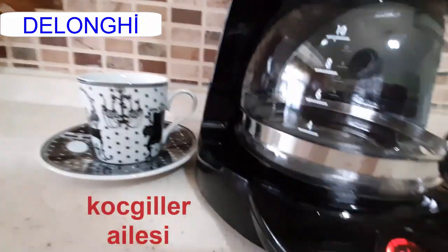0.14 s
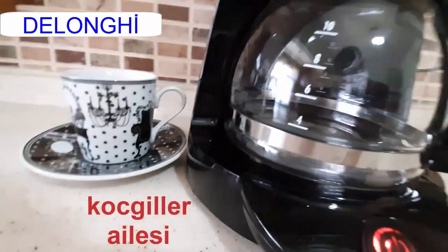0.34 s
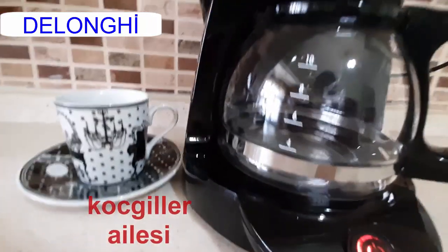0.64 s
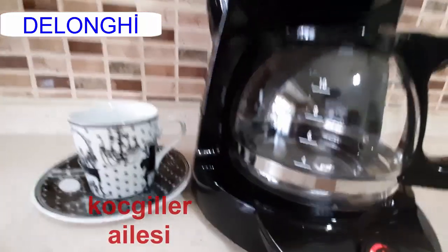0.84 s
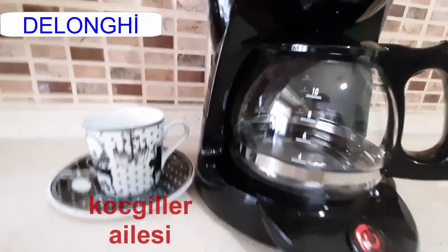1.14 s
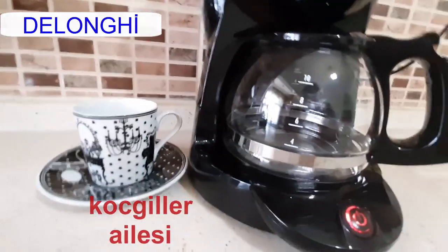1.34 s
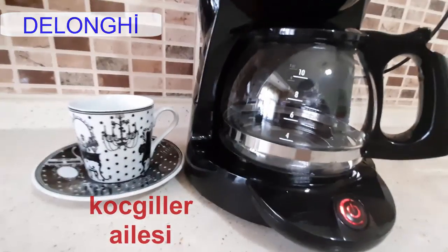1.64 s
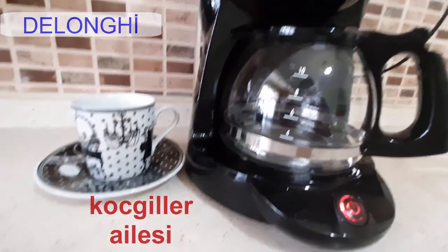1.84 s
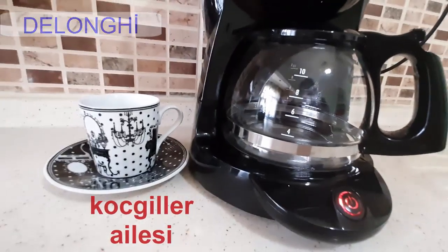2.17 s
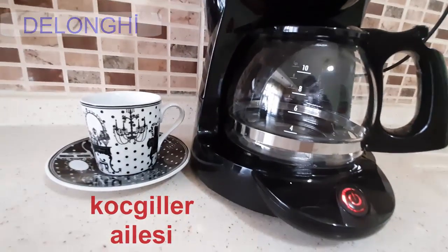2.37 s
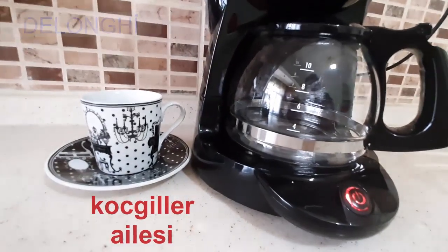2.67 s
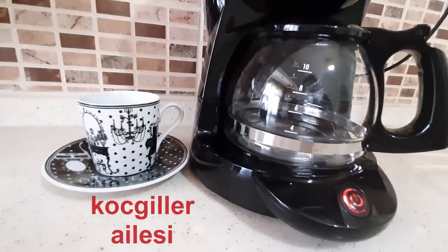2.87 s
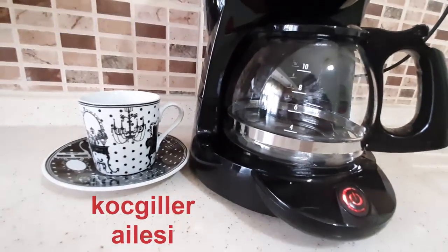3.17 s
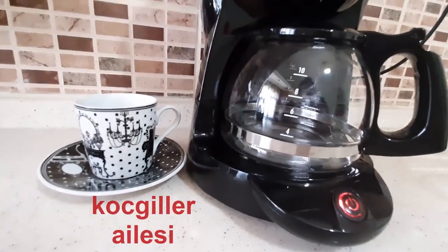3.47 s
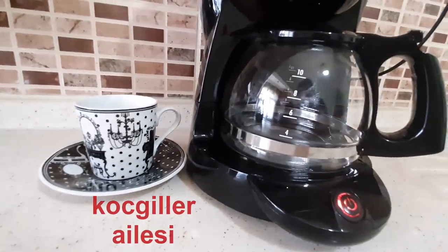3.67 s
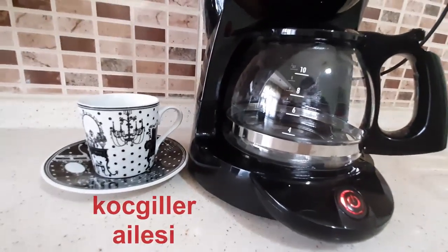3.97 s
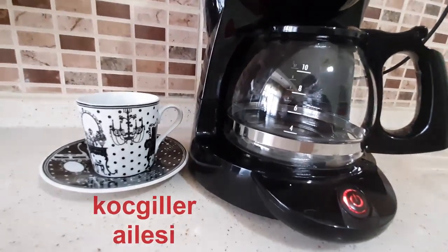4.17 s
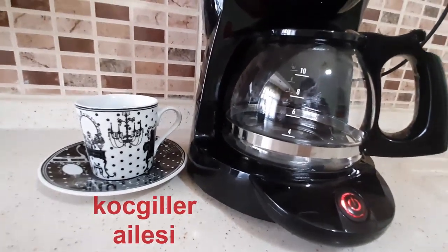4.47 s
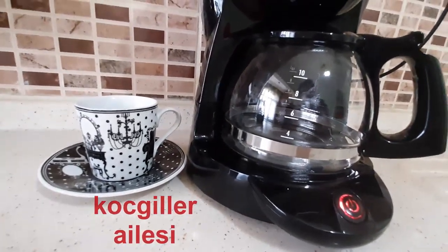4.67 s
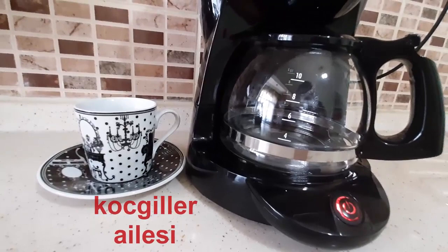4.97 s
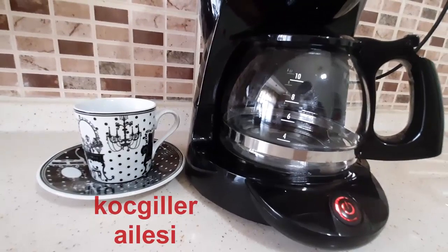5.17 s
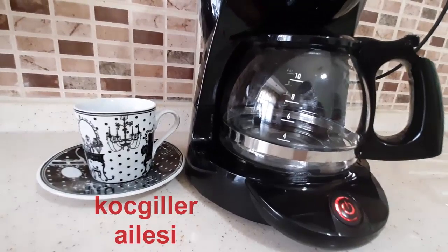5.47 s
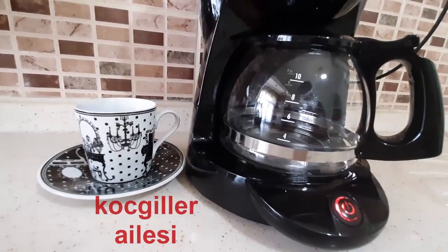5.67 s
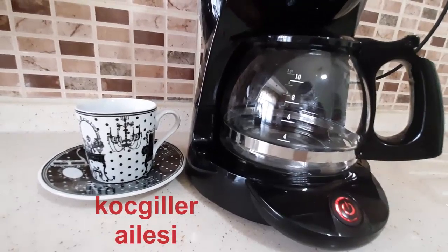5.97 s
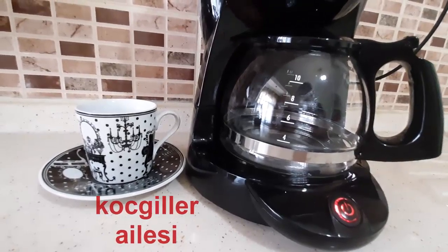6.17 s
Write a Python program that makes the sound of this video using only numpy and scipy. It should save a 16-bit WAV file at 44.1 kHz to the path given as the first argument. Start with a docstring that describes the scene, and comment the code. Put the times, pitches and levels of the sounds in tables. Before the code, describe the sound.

A coffee machine heating water, heard close on a hand-held phone in a kitchen. Breathy steam hiss and a hollow, wavering low hum continue throughout. Wet pops and gurgles crowd the first second, thin out, surge again after three seconds, calm down, then return towards the end. Fingers rasp and tick against the phone, mostly on the left.

```python
"""A drip coffee maker heats up on a tiled kitchen counter, heard through a hand-held phone with two ports.
From the start noise through resonances makes the empty jug's hum, water, hissing steam and tube whistles.
Bubbles burst as puffs of noise, most densely around 0.4-1.3 s, 3.1-3.9 s and 5.2-6.3 s; each stirs the water.
Fingers rasp, tick and knock on the phone from 0.26 s, as noise puffs, ringing clicks and low sines;
from 0.55 s big bubbles plop as short rising sines."""
import sys
import numpy as np
from scipy import signal
from scipy.io import wavfile
from scipy.ndimage import uniform_filter1d

SR = 44100
rng = np.random.default_rng(int(sys.argv[2]) if len(sys.argv) > 2 else 0)


def to_wav(s):
    """Save 16-bit WAV."""
    ch = np.atleast_2d(s).T  # columns
    pcm = np.round(np.clip(ch, -1, 1) * 32767)  # PCM
    wavfile.write(sys.argv[1], SR, pcm.astype(np.int16))


N = 278271

# Bubbles bursting in the tube. Each row: start in seconds, low splash, high splash and spit levels in dB,
# spit pitch in Hz, length in seconds.
BURSTS = [(0.07, -46, -46, -39, 3400, .006), (0.391, -40, -34, -39, 3380, 0.016),
          (0.532, -56, -54, -31, 3370, .004), (0.543, -45, -34, -40, 4900, .009),
          (0.579, -49, -36, -45, 4260, 0.0073), (0.603, -36.5, -38, -33.5, 4260, 0.0078),
          (0.608, -31.5, -29, -32.5, 3250, 0.017), (0.658, -45, -33, -37, 4000, .005),
          (0.67, -42, -33.5, -44, 3000, 0.0071), (0.713, -40, -34, -31, 3290, 0.0091),
          (0.758, -58, -31.5, -45, 3900, 0.026), (0.87, -48, -58, -51, 4120, 0.011),
          (0.909, -29.5, -26, -39, 3900, 0.03), (0.913, -36, -44, -31.5, 3820, 0.025),
          (0.941, -34, -29, -32, 4070, 0.0063), (0.98, -39, -47, -27, 3500, 0.0084),
          (1.027, -56, -48, -38, 3600, .004), (1.091, -36, -52, -31, 3530, 0.012),
          (1.115, -29, -29.5, -52, 4190, 0.025), (1.136, -34, -29, -49, 3370, 0.026),
          (1.302, -48, -33.5, -49, 3890, 0.02), (1.883, -38, -32, -37, 4470, 0.0074),
          (2.028, -42, -39.5, -39, 3800, 0.019), (2.744, -40, -47, -40, 4270, 0.0043),
          (2.791, -56, -39, -40, 4360, 0.0068), (3.103, -47, -52, -33, 3380, 0.0079),
          (3.116, -33.5, -45, -37, 3100, 0.014), (3.18, -35.5, -51, -39, 4000, 0.0046),
          (3.214, -34.5, -39, -31.5, 3160, 0.026), (3.251, -36, -39, -28, 3460, 0.0094),
          (3.263, -32, -35, -32, 3100, 0.017), (3.342, -39, -53, -33, 3400, 0.013),
          (3.363, -36, -50, -30.5, 3500, 0.012), (3.415, -37, -35, -27, 4170, 0.01),
          (3.451, -32, -41, -24.5, 3430, 0.0075), (3.456, -40, -38, -30, 3430, 0.0065),
          (3.471, -47, -52, -29, 5070, 0.0082), (3.498, -28.5, -29, -36, 4200, 0.0073),
          (3.54, -33, -48, -50, 4065, .006), (3.573, -42, -53, -34.5, 3780, 0.018),
          (3.62, -51, -53, -34, 3480, 0.0091), (3.65, -33, -38, -37, 3500, 0.029),
          (3.68, -32, -53, -39, 4530, 0.022), (3.71, -37, -34, -33.5, 3870, 0.024),
          (3.922, -33, -36, -47, 3870, 0.0046), (3.949, -31.5, -24.5, -36, 3250, 0.0085),
          (5.238, -36.5, -34, -36, 4440, 0.012), (5.267, -55, -35, -46, 4860, 0.013),
          (5.285, -52, -39, -58, 4164, 0.0089), (5.434, -58, -51, -51, 4300, 0.0058),
          (5.483, -46, -39, -46, 4200, 0.0045), (5.525, -50, -36.5, -39, 4410, 0.015),
          (5.556, -35.5, -44, -36, 3900, 0.0076), (5.642, -43, -46, -46, 3930, 0.0057),
          (5.931, -38.5, -50, -39, 4350, 0.0063), (5.997, -34.5, -44, -33.5, 4340, 0.011),
          (6.109, -42, -49, -42, 3950, .008), (6.136, -41, -36, -35.5, 3950, 0.0081),
          (6.151, -30, -41, -41, 4100, 0.0055), (6.184, -39, -33, -44, 4380, 0.0076),
          (6.218, -53, -54, -25.5, 3700, 0.0032), (6.222, -58, -55, -31, 3300, 0.0083),
          (6.26, -37, -32, -47, 4230, 0.0067), (6.268, -40, -46, -35, 3100, 0.012),
          (6.279, -30, -38, -27.5, 3500, 0.019), (6.301, -31.5, -35, -35, 4800, .008)]
# Resonances of the plastic housing. Each row: pitch in Hz, width in Hz, relative level in dB.
HOUSING_MODES = [(3400, 350, 15.5), (4270, 120, 11.5), (4950, 1500, 2), (3200, 570, -6)]
# Balance of the two ports by pitch. Each row: pitch in Hz, left minus right in dB.
PORT_BALANCE = [(60, -8), (110, 0), (200, -3), (380, 0.5), (700, -1.5), (1290, 0), (2380, -1), (4400, -4.5),
                (8120, 3), (15000, -2.5)]

PORT_LAG_S = 0.00019   # the left port hears shared sound this much later
SPLASH_PAN_DB = -2.7   # left minus right


def amp(db):
    """dB to gain."""
    return 10 ** (np.asarray(db) / 20)


def rms_one(x):
    """Scale to rms 1."""
    return x / np.sqrt(np.mean(x ** 2) + 1e-20)


def peak_one(x):
    """Scale to a typical peak of 1: 2.5 times the loudest short-term rms."""
    return x / (2.5 * np.sqrt(np.max(uniform_filter1d(x ** 2, size=200))))


def at_hz(points, hz):
    """Read a table on a log-frequency axis."""
    table_hz, values = np.transpose(points)
    return np.interp(np.log(hz), np.log(table_hz), values)


def in_time(rows):
    """Columns of a table as straight lines in time."""
    s, *columns = np.transpose(rows)
    return [np.interp(np.arange(N) / SR, s, c) for c in columns]


def drift(corner_hz):
    """Slow chance of spread 1: noise at SR / 40 through a double one-pole."""
    r = np.exp(-80 * np.pi * corner_hz / SR)
    coarse = rng.standard_normal(N // 40 + 2002)
    slow = signal.lfilter([1], [1, -2 * r, r * r], coarse)[2000:]   # settled
    return np.interp(np.arange(N) / 40, np.arange(len(slow)), rms_one(slow))


def resonate(x, hz, width_hz):
    """Two-pole resonance, gain 1 on top."""
    r = np.exp(-np.pi * width_hz / SR)
    poles = [1, -2 * r * np.cos(2 * np.pi * hz / SR), r * r]
    return signal.lfilter([(1 - r * r) / 2, 0, (r * r - 1) / 2], poles, x)


def stereo_pair(hz, mid, side):
    """Left and right as alike and as loud as the two ports hear this pitch."""
    # Each row: pitch in Hz, left-right likeness (correlation).
    likeness = [(60, 0.92), (130, 0.76), (290, 1), (640, 0.57), (1410, 0.061), (3100, -0.1), (6820, -0.29),
                (15000, 0.14)]
    alike = np.clip(at_hz(likeness, hz), -.99, .99)
    lean = amp(at_hz(PORT_BALANCE, hz) / 2 * np.array([[1], [-1]]))
    return lean * (np.sqrt(1 + alike) * mid + np.sqrt(1 - alike) * side * [[1], [-1]])


def banded(spectrum, patchy_db, flicker_hz, grain_db):
    """Narrow bands of grainy stereo noise, flickering partly together, partly each on its own; rms 1."""
    low, high = spectrum[0][0], spectrum[-1][0]
    edges = low * 2 ** np.arange(0, np.log2(high / low) + .2, .4)   # 0.4 octave apart
    grains = amp(grain_db * drift(184))   # bubbles come in clumps
    white = rng.standard_normal((2, 2, N)) * grains
    out, together = 0, drift(flicker_hz)
    for k, (a, b) in enumerate(zip(edges, np.minimum(edges[1:], .45 * SR))):
        band = signal.butter(2, [a, b], "band", fs=SR, output="sos")
        mid, side = signal.sosfilt(band, white[k % 2])
        hz = np.sqrt(a * b)
        level_db = at_hz(spectrum, hz) + patchy_db * (together + drift(flicker_hz))
        out = out + amp(level_db) * stereo_pair(hz, mid, side)
    return rms_one(out)


def sung(modes):
    """Turbulent noise singing in fixed resonances of wavering level; rms 1."""
    out, white = 0, rng.standard_normal((2, N))
    for hz, width_hz, level_db in modes:
        mid, side = resonate(resonate(white, hz, width_hz), hz, 3 * width_hz)
        gain = amp(level_db + 2.95 * drift(3.6)) / np.sqrt(width_hz)
        out = out + gain * stereo_pair(hz, mid, side)
    return rms_one(out)


def whistle(centre_hz, width_hz, left_db, shared):
    """A broken, wandering note: narrow noise on a carrier, partly shared by the ports; rms 1."""
    phase = 2 * np.pi * np.cumsum(centre_hz) / SR
    lowpass = signal.butter(2, width_hz / 2, fs=SR, output="sos")
    slow = signal.sosfilt(lowpass, rng.standard_normal((2, 2, N)))   # (cosine / sine part, port, time)
    slow[:, 0] += shared * np.array([slow[1, 1], -slow[0, 1]])   # the shared part arrives a quarter cycle apart
    note = slow[0] * np.cos(phase) + slow[1] * np.sin(phase)
    waver = amp(0.38 * drift(30) + 2.5 * drift(3.1))
    return rms_one(amp([[left_db], [0]]) * waver * note)


def bubbles(per_s, cycles, low_hz, high_hz, lag_s):
    """Bubbles collapse at random in clumps, each ringing a few cycles; rms 1."""
    sizes = amp(4.5 * np.minimum(rng.exponential(1, N), 3.5)) * rng.choice([-1, 1], N)
    born = rng.random(N) < per_s * amp(5 * drift(12)) / SR
    dealt, out = rng.integers(0, 10, N), np.zeros((2, N))
    for k, hz in enumerate(np.geomspace(low_hz, high_hz, num=10)):
        hits = sizes * born * (dealt == k) + 1e-18   # never exactly zero
        ring = resonate(resonate(hits, hz, hz / cycles), hz, 1.9 * hz / cycles)
        ring = amp(-3.5 * np.log2(hz / low_hz)) * rms_one(ring)
        out += amp([[at_hz(PORT_BALANCE, hz)], [0]]) * [np.roll(ring, round(lag_s * SR)), ring]
    return rms_one(out)


def burst(length_s, rise_s, snap, grain_db, size):
    """A stereo puff of grainy noise: a snap at the start, about length_s of body, then a quick fade."""
    t = np.arange(size) / SR
    shape = np.exp(-(t / length_s) ** 2) + snap * np.exp(-t / 0.00051)
    grains = amp(grain_db * np.repeat(rng.standard_normal(size // 64), 64))
    return rng.standard_normal((2, size)) * (1 - np.exp(-t / rise_s)) * shape * grains


def add(out, s, sound, pan_db):
    """Mix a sound in at time s, panned by pan_db left minus right."""
    i = round(s * SR)
    panned = amp(pan_db / 2 * np.array([[1], [-1]])) * sound
    out[:, i:i + sound.shape[-1]] += panned[:, :N - i]


def swells(times, peaks_db, shape):
    """Sum of one shape in time per event, each as high as its peak."""
    t = np.linspace(0, N / SR, num=3000)
    return np.interp(np.arange(N) / SR, t, amp(peaks_db) @ shape(t - np.reshape(times, (-1, 1))))


def stirring():
    """Every burst stirs the water for a moment: one swell each, as high as its low splash; powers add."""
    rise_s, fall_s = 0.0068, 0.022   # of the power
    s, low_db, *_ = np.transpose(BURSTS)
    power = swells(s, 2 * low_db, lambda t: np.exp(-np.abs(t) / np.where(t < 0, rise_s, fall_s)))
    return np.sqrt(power)


def stirred(level_db, stir, stir_db):
    """Gain of a steady level with the stir on top, stir_db against the splashes; powers add."""
    return np.hypot(amp(level_db), amp(stir_db) * stir)


def jug_hum():
    """The jug's air resonance: noise rung to a wavering note on a slow level, short booms and weaker modes."""
    # Each row: time in seconds, steady level in dB.
    hum_level = [(0.0, -54.5), (0.42, -47), (0.49, -63), (0.56, -43.5), (1.1, -46), (1.5, -46.5),
                 (2.1, -45.5), (2.8, -47), (2.9, -52.5), (3.32, -47), (3.5, -41.5), (3.95, -40),
                 (4.22, -51.5), (4.9, -43.5), (5.55, -44.5), (5.85, -52.5), (6.31, -52)]
    # The hum booms out for a moment. Each row: centre in seconds, peak level in dB.
    boom_rows = [(.09, -41), (.21, -38.5), (.62, -41), (.685, -35), (.775, -50), (.945, -41), (.995, -47),
                 (1.065, -38.5), (1.118, -47), (1.19, -39), (1.363, -34.5), (1.589, -37.5), (1.76, -38),
                 (2.0, -40), (2.321, -41), (2.99, -47), (3.151, -35.5), (3.465, -38), (3.525, -35),
                 (3.6, -45), (3.76, -39.5), (3.98, -35), (4.44, -48.5), (4.64, -45), (4.76, -39.5),
                 (4.93, -37.5), (5.09, -47), (5.27, -36), (5.431, -40), (5.52, -40), (5.64, -42),
                 (5.761, -35), (5.98, -36), (6.019, -43), (6.115, -49), (6.157, -42), (6.205, -39.5)]
    # Weaker modes. Each row: pitch in Hz, width in Hz, relative level in dB.
    jug_modes = [(236, 17.5, -3), (271.4, 19.5, 1), (357.4, 30, -4), (376.5, 13.5, -2.5), (444, 13.4, -8.5),
                 (615, 24, -7)]
    hum_hz, width_hz, boom_spread_s = 306.1, 19, 0.022
    lump_db, lump_corner_hz, evenness = 1, 12, 0.85
    white = rng.standard_normal((2, N))
    mid, side = resonate(resonate(white, hum_hz, width_hz), hum_hz, 3 * width_hz)
    swell = uniform_filter1d(rms_one(mid) ** 2, size=1800) + 0.11
    note = rms_one(stereo_pair(hum_hz, mid, side) / swell ** (evenness / 2))   # partly evened out
    steady = amp(*in_time(hum_level))
    booms = swells(*np.transpose(boom_rows), lambda t: np.exp(-(t / boom_spread_s) ** 2 / 2))
    level = np.hypot(steady * amp(lump_db * drift(lump_corner_hz)), booms)
    return level * note + amp(-3.5) * steady * sung(jug_modes)


def churning(stir):
    """Low churning of the water: flickering bands of noise and low collapsing bubbles."""
    # Each row: pitch in Hz, relative level in dB per Hz.
    churn_spectrum = [(310, -3), (360, -3), (470, -4.5), (620, -5), (715, -5)]
    # Each row: time in seconds, level in dB before stirring.
    churn_level = [(0.0, -47.5), (0.25, -52.5), (0.32, -45), (0.47, -50.5), (0.6, -48.5), (1.1, -47),
                   (1.5, -54.5), (2.0, -53.5), (3.14, -59), (3.27, -54), (3.46, -52), (3.6, -43.5),
                   (3.82, -54.5), (4.7, -56), (5.4, -54.5), (5.52, -49), (5.8, -55), (6.1, -54),
                   (6.31, -57)]
    level_db, = in_time(churn_level)
    water = banded(churn_spectrum, patchy_db=1.17, flicker_hz=7.3, grain_db=1.5)
    glugs = amp(-9) * bubbles(per_s=60, cycles=3.9, low_hz=333, high_hz=743, lag_s=0)
    return stirred(level_db, stir, -15.5) * (water + glugs)


def gurgling(boil_db, stir):
    """Water gurgles in the heater tube: flickering bands plus noise singing in the tube's resonances."""
    # Each row: pitch in Hz, relative level in dB per Hz.
    gurgle_spectrum = [(800, -16), (920, -5.5), (1200, -9.5), (1600, -9.5), (2100, -8.5), (2700, -8.5),
                       (3300, -17.5)]
    # Faint whistles in the tube. Each row: pitch in Hz, width in Hz, relative level in dB.
    tube_modes = [(1054, 16, 1), (1520, 57, 4), (2020, 43, 2)]
    water = banded(gurgle_spectrum, patchy_db=2.0, flicker_hz=8.6, grain_db=0.5)
    return stirred(boil_db, stir, -15.5) * (water + amp(-8.0) * sung(tube_modes))


def crackling(boil_swing_db, stir):
    """Small bubbles collapse at random, louder as the boil rises and when stirred."""
    level_db = -66 + 1.04 * boil_swing_db
    small = bubbles(per_s=160, cycles=6.3, low_hz=803, high_hz=4800, lag_s=PORT_LAG_S)
    return stirred(level_db, stir, -19) * small


def rumbling(boil_swing_db, stir):
    """Low noise bands follow a third of the boil's swing and every stir."""
    # Each row: pitch in Hz, relative level in dB per Hz.
    rumble_spectrum = [(18, -19), (33, -43), (50, -14.5), (70, -22), (131, -3), (184, -7.5), (260, -2.5),
                       (300, 3)]
    level_db = -51.5 + 0.32 * boil_swing_db
    low_noise = banded(rumble_spectrum, patchy_db=1.86, flicker_hz=17.0, grain_db=0.5)
    return stirred(level_db, stir, -19.5) * low_noise


def simmer_hiss():
    """Noise in broad resonances, a share reaching both ports, the left one later; faint steam bands added."""
    # Hiss coloured differently at each port. Each row: pitch in Hz, width in Hz, left and right relative
    # levels in dB.
    simmer_modes = [(3226, 510, -6.5, -4), (3430, 310, -4.5, 4), (3776, 360, -5, -0.5),
                    (4260, 450, -2, 5.5), (4966, 295, -37, 4), (5370, 440, 0.5, -1.5), (6160, 680, -12, 0),
                    (6894, 350, -4, -7), (7620, 560, -24, -7)]
    # The highest bands come and go. Each row: time in seconds, gain in dB.
    top_level = [(0, -2.5), (.9, -1), (1.2, 2), (2.7, 0), (2.9, -3), (3.4, 0), (3.8, 2), (5.7, 0),
                 (5.95, 0), (6.31, 1)]
    # Each row: pitch in Hz, relative level in dB per Hz.
    steam_spectrum = [(2000, -47), (2600, -29), (3400, -22), (4300, 5), (6200, 2), (7700, -9), (8700, -24)]
    share, top_from_hz = 0.11, 6500
    common, *own = rng.standard_normal((3, N))
    both = np.array([np.roll(common, round(PORT_LAG_S * SR)), common])
    pair = np.sqrt(share) * both + np.sqrt(1 - share) * np.array(own)
    out, (top_db,) = 0, in_time(top_level)
    for k, (hz, width_hz, left_db, right_db) in enumerate(simmer_modes):
        band = resonate(resonate(pair, hz, width_hz), hz, 4.5 * width_hz) / np.sqrt(width_hz)
        level_db = np.array([[left_db], [right_db]]) + 1.3 * drift(18) + top_db * (hz > top_from_hz)
        out = out + (-1) ** k * amp(level_db) * band
    steam = banded(steam_spectrum, patchy_db=1.5, flicker_hz=34, grain_db=-2.0)
    return rms_one(out) + amp(-19.0) * steam


def outlet_whistle(whistle_db):
    """The outlet whistles: narrow noise on a wandering pitch."""
    # Each row: time in seconds, centre pitch in Hz before wandering.
    pitch = [(0, 3420), (.45, 3420), (.55, 3900), (.8, 3930), (1.05, 3800), (1.6, 3800), (2.8, 3950),
             (3.6, 3960), (4.2, 4050), (5.5, 3980), (6.31, 3920)]
    centre_hz = in_time(pitch)[0] + 25 * drift(4.6)
    return amp(whistle_db) * whistle(centre_hz, width_hz=235, left_db=-11, shared=0.22)


def tube_note(stir):
    """The lowest note of the tube drifts with the water level and swells when stirred."""
    # Each row: time in seconds, relative level in dB, pitch in Hz.
    note_rows = [(0.0, -62.5, 884), (0.58, -70, 857), (0.75, -61, 862), (1.54, -69, 880), (2.48, -64, 866),
                 (2.83, -68, 861), (3.11, -71, 861), (3.51, -60, 861), (3.78, -67, 854), (3.95, -65, 814),
                 (4.2, -61.5, 863), (4.59, -68, 870), (5.0, -60, 870), (5.2, -58.5, 805), (5.7, -58.5, 803),
                 (5.87, -69, 820), (6.31, -71, 820)]
    relative_db, note_hz = in_time(note_rows)
    note = whistle(note_hz, width_hz=59, left_db=-2.5, shared=0.51)
    return stirred(relative_db + 5.0, stir, -24) * note


def whistle_undertone():
    """A thin whine on a fixed pitch near half the outlet whistle's, at a steady level."""
    return amp(-69.5) * whistle(np.full(N, 2025), width_hz=64, left_db=-4.0, shared=0.4)


def housing_buzz(boil_swing_db):
    """The housing buzzes along in its resonances, exaggerating the boil's swing."""
    return amp(-69.5 + 2.9 * boil_swing_db) * sung(HOUSING_MODES)


def treble_hiss(stir_lift):
    """Treble noise bands on a slow level, lifted as stirring lifts the steam."""
    # Each row: pitch in Hz, relative level in dB per Hz.
    treble_spectrum = [(7600, -8), (8700, -9), (11500, -6.5), (13300, 2)]
    # Each row: time in seconds, level in dB before filtering and stirring.
    treble_level = [(0.0, -68.5), (0.58, -63.5), (0.79, -60.5), (1.3, -56.5), (1.79, -66), (2.6, -65.5),
                    (2.99, -72.5), (3.78, -58.5), (4.22, -68), (5.46, -63), (6.01, -69), (6.31, -67)]
    treble = banded(treble_spectrum, patchy_db=0.6, flicker_hz=17, grain_db=1.0)
    thinning = signal.butter(5, 13800, fs=SR, output="sos")   # the hiss thins out at the very top
    return stir_lift * amp(*in_time(treble_level)) * signal.sosfilt(thinning, treble)


def pops():
    """Each burst rings the low and the high modes of the water path, a bright spit and the plastic housing."""
    # Water path, three low modes, then the high ones. Each row: pitch in Hz, width in Hz, relative level in dB.
    water_modes = [(861, 54, 0), (1083, 60, -4.5), (1520, 510, -11), (1533, 150, 7), (1653, 30, 4),
                   (1800, 470, 10.5), (2040, 22, 6), (2370, 320, -2.5)]
    share, spit_width_hz, housing_db = 0.18, 340, -14.5   # share of the puff heard by both ports
    spit_pan_db, pan_scatter_db = -5, -1
    crack_samples, crack_gain = 5, 5
    out = np.zeros((2, N))
    spit_band = signal.butter(2, [2500, 5600], "band", fs=SR, output="sos")
    for s, low_db, high_db, spit_db, spit_hz, length_s in BURSTS:
        puff = burst(length_s, rise_s=0.00022, snap=0.27, grain_db=3.5, size=2048)
        crack = crack_gain * np.hanning(crack_samples) * rng.choice([-1, 1])
        puff[:, :crack_samples] += crack   # the skin of the bubble snaps
        scatter_db = pan_scatter_db * rng.standard_normal()
        left, right = np.sqrt(1 - share) * puff[0], puff[1]
        wet = [left + np.sqrt(share) * right, right]   # low pitches reach both ports in step
        late = np.roll(right, round(PORT_LAG_S * SR))
        bright = np.array([left + np.sqrt(share) * late, right])
        spit = resonate(resonate(bright, spit_hz, spit_width_hz), spit_hz, 1800)
        for hz, width_hz, db in HOUSING_MODES:
            gain = amp(housing_db + db + rng.normal(0, 0.99))
            spit = spit + gain * resonate(resonate(bright, hz, width_hz), hz, 30.0 * width_hz)
        modes = []
        for k, (hz, width_hz, db) in enumerate(water_modes):
            gain = (-1) ** k * amp(db + rng.normal(0, 3))
            modes.append(gain * resonate(resonate(wet, hz, width_hz), hz, 4 * width_hz))
        splash = amp(low_db) * peak_one(sum(modes[:3])) + amp(high_db) * peak_one(sum(modes[3:]))
        add(out, s, splash, SPLASH_PAN_DB + scatter_db)
        spit = amp(spit_db) * peak_one(signal.sosfilt(spit_band, spit))
        add(out, s, spit, spit_pan_db + scatter_db)
    return out


def slips():
    """Fingers slip on the case near one port: wide rasping noise with its own treble."""
    # Each row: start in seconds, body level in dB, treble level in dB, length in seconds, left minus right in dB.
    slip_rows = [(0.262, -63, -68, 0.012, -10), (0.27, -52, -73, 0.0078, 3), (0.289, -43.5, -70, 0.082, 12),
                 (0.347, -46, -53, 0.022, 26.5), (0.613, -37, -66, 0.063, 13.5),
                 (0.794, -44, -58, 0.056, 22.5), (0.914, -36, -45, 0.02, 1), (1.742, -37, -56, 0.027, 26.5),
                 (2.58, -41, -60, 0.0035, 17), (2.605, -30.5, -57, 0.012, 17.5),
                 (3.746, -36.5, -47, 0.029, -6), (3.951, -35, -76, 0.0028, -16),
                 (5.975, -45, -75, 0.021, -4)]
    out = np.zeros((2, N))
    body_band = signal.butter(3, [800, 8000], "band", fs=SR, output="sos")
    top_band = signal.butter(4, 8500, "high", fs=SR, output="sos")
    for s, body_db, treble_db, length_s, pan_db in slip_rows:
        puff = burst(length_s, rise_s=0.0034, snap=0.3, grain_db=2.5, size=4096)
        body = amp(body_db) * peak_one(signal.sosfilt(body_band, puff))
        treble = amp(treble_db) * peak_one(signal.sosfilt(top_band, puff))
        add(out, s, body + treble, pan_db)
    return out


def ticks():
    """Fingernails tick on the case: one sharp click, ringing for a cycle or two."""
    # Each row: start in seconds, peak in dB before panning, pitch in Hz, left minus right in dB.
    tick_rows = [(0.2632, -41, 4500, 16), (0.2729, -38.5, 1180, 25), (0.293, -35, 1510, 16),
                 (0.582, -33, 3500, 17), (0.618, -33, 4000, 28), (2.581, -31, 1250, 24.5),
                 (2.6043, -25, 2920, 22)]
    out, click = np.zeros((2, N)), -signal.unit_impulse(512)
    click = signal.sosfilt(signal.butter(2, 7500, fs=SR, output="sos"), click)   # the nail is slightly soft
    for s, peak_db, hz, pan_db in tick_rows:
        tick = resonate(resonate(click, hz, 0.8 * hz), hz, 1.3 * hz)
        add(out, s, amp(peak_db) * tick / np.max(np.abs(tick)), pan_db)
    return out


def thumps():
    """The hand knocks through the case: soft low pushes, fading sines out of step at the two ports."""
    # Each row: start in seconds, relative level in dB, pitch in Hz.
    thump_rows = [(.289, -61, 56), (0.36, -50, 146), (.599, -51, 50), (.815, -47, 65), (.904, -49, 79.7),
                  (0.939, -47, 64.6), (1.106, -49, 93), (1.409, -51, 62.3), (1.73, -83, 155),
                  (2.601, -58, 49.9), (3.225, -55, 147.8), (3.572, -47, 80.5), (3.619, -55, 70),
                  (3.589, -40.5, 174), (3.66, -51, 75), (3.69, -48, 167), (3.749, -59, 55), (3.95, -65, 60),
                  (5.959, -53, 151), (6.142, -55, 143)]
    out, t = np.zeros((2, N)), np.arange(6000) / SR
    envelope = t / 0.0081 * np.exp(1 - t / 0.01)
    for s, level_db, hz in thump_rows:
        phases = [[0], [rng.uniform(0, 1.16)]]
        add(out, s, amp(level_db) * np.sin(2 * np.pi * hz * t + phases) * envelope, 0)
    return out


def plops():
    """Big rounded bubbles: a sine that swells, fades and climbs a little, in step at both ports."""
    # Each row: start in seconds, envelope peak in dB before panning, starting pitch in Hz, ring time in seconds.
    plop_rows = [(.545, -36.5, 840, 0.0054), (.61, -41, 1910, 0.0055), (.917, -35, 1085, 0.0078),
                 (0.919, -33.5, 1540, 0.0053), (0.943, -36, 1620, 0.0056), (.989, -26, 400, 0.003),
                 (1.111, -37, 477, 0.0036), (1.116, -38, 810, 0.0041), (1.118, -37, 1410, .005),
                 (1.13, -42, 847, 0.012), (1.135, -39, 1996, 0.01), (1.122, -40, 1750, 0.007),
                 (1.145, -47, 1970, 0.0083), (3.416, -36, 1230, 0.0036), (3.463, -43, 1980, 0.0059),
                 (3.454, -36, 449, 0.0046), (3.498, -38, 1000, 0.0033), (3.499, -44, 565, 0.0044),
                 (3.585, -40, 520, 0.0056), (3.62, -33, 570, .005), (3.68, -45, 590, 0.0043),
                 (3.654, -37.5, 1290, 0.0047), (5.24, -48, 1810, 0.0048), (5.651, -44, 1800, 0.0058),
                 (5.993, -45.5, 1850, 0.0099), (6.112, -40.5, 802, 0.0081), (6.152, -45, 825, 0.007),
                 (6.19, -34, 483, 0.0021), (6.261, -32, 1240, 0.0029), (6.27, -42, 1014, .005),
                 (6.28, -35, 1216, 0.0066), (6.283, -40, 1750, 0.004), (6.295, -47, 745, 0.0054),
                 (6.291, -38, 1180, .007)]
    climb = 0.029   # share of the pitch gained in one ring time
    out, t = np.zeros((2, N)), np.arange(2048) / SR
    for s, peak_db, hz, ring_s in plop_rows:
        x = t / ring_s
        turns = hz * t * (1 + climb * x / 2) + rng.random()
        note = np.sin(2 * np.pi * turns) * 2 * x * np.exp(1 - 2 * x)
        add(out, s, amp(peak_db) * note[None], SPLASH_PAN_DB)
    return out


def scene():
    """Boil and steam drive most of the steady layers; each burst stirs many of them up."""
    # Vigour of the heating. Each row: time in seconds, boil, steam and outlet whistle levels in dB.
    heat = [(0.0, -52.5, -51, -56), (0.46, -52.5, -52.5, -62), (0.6, -48, -47, -54),
            (0.93, -46, -51.5, -48.5), (1.15, -50, -46.5, -54.5), (1.49, -51.5, -48.5, -64),
            (1.8, -56, -50.5, -64), (2.28, -56.5, -51, -61), (2.64, -51, -50.5, -58),
            (2.88, -56, -55, -55.5), (3.14, -58, -55.5, -53.5), (3.46, -48.5, -53, -46.5),
            (3.62, -45.5, -48.5, -51), (3.85, -50, -47, -58), (4.1, -53.5, -50, -60),
            (4.36, -58.5, -52, -65), (5.13, -55.5, -49, -69), (5.52, -52.5, -48.5, -55),
            (5.72, -52, -50, -58), (5.9, -56, -54.5, -55), (6.31, -52.5, -54.5, -53.5)]
    boil_db, steam_db, whistle_db = in_time(heat)
    boil_swing_db = boil_db - boil_db.mean()
    stir = stirring()
    steam = stirred(steam_db, stir, -19.5)
    water = churning(stir) + gurgling(boil_db, stir) + crackling(boil_swing_db, stir)
    low = jug_hum() + rumbling(boil_swing_db, stir)
    hiss = steam * simmer_hiss() + treble_hiss(steam / amp(steam_db))
    notes = outlet_whistle(whistle_db) + tube_note(stir) + whistle_undertone() + housing_buzz(boil_swing_db)
    hand = slips() + ticks() + thumps()
    return low + water + hiss + notes + pops() + hand + plops()


def record(dry):
    """The top is cut: 70 dB down from 16.9 kHz upward."""
    return signal.sosfilt(signal.cheby2(12, 70, 16900, fs=SR, output="sos"), dry)


dry = scene()
out = record(dry)
to_wav(out)
```